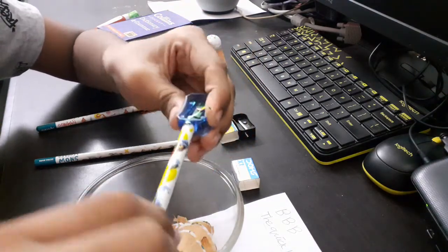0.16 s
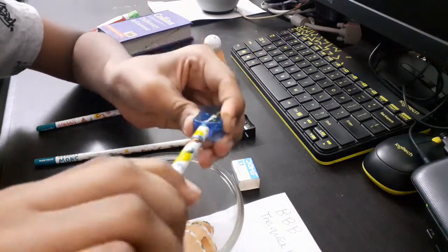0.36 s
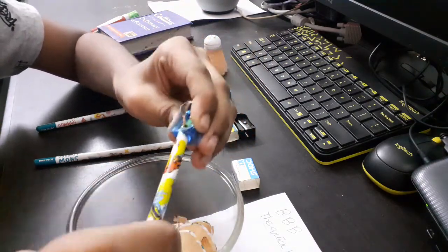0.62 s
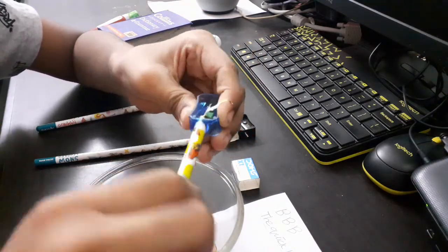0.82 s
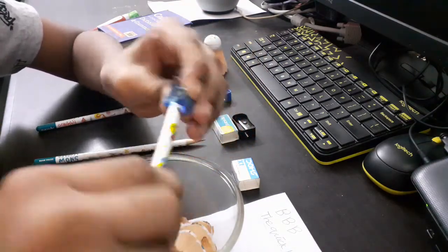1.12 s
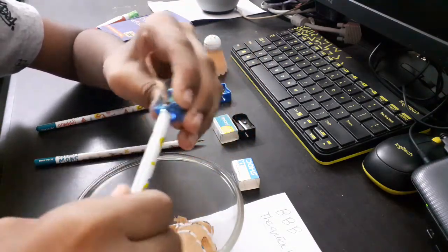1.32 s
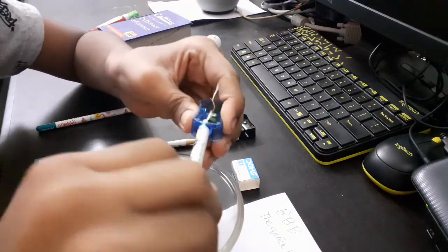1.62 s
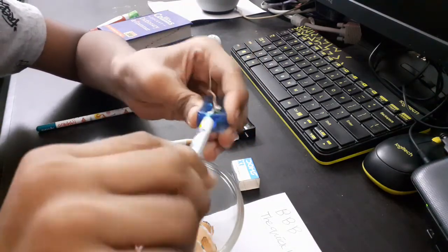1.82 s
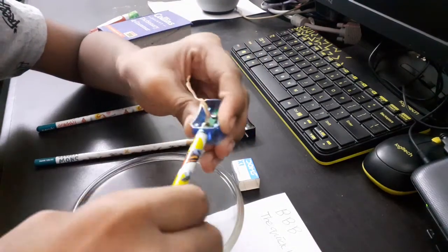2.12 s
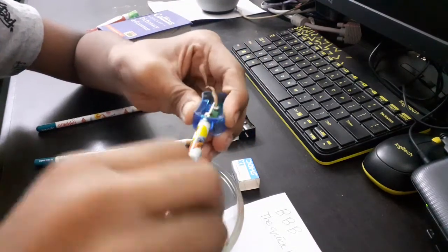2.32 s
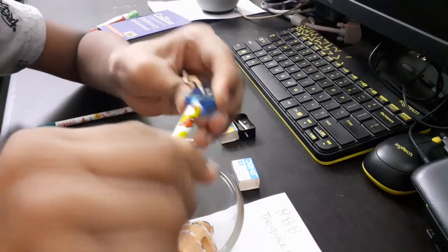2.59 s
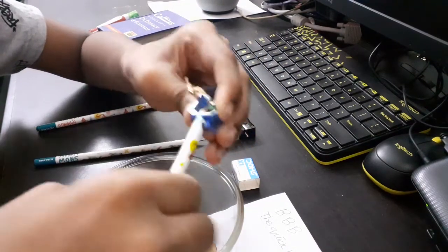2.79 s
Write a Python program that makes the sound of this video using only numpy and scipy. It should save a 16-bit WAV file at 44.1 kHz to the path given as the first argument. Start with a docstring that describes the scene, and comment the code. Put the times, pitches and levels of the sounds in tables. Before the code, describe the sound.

Dry scraping of a wooden pencil in a small plastic sharpener, four short turns.

```python
"""At a desk in a quiet room: a wooden pencil is twisted four times in a small plastic hand sharpener.
Each twist starts with a few catches of the blade, then fibres tear in a dense rasp that rings the
hollow sharpener, the pencil and the blade. Fingers regrip the pencil; something bumps the desk once.
Low room rumble, wavering hums and faint hiss lie beneath."""
import sys
import numpy as np
from scipy import signal
from scipy.fft import rfft, irfft, next_fast_len
from scipy.io import wavfile
from scipy.ndimage import uniform_filter1d

SR = 44100
rng = np.random.default_rng(int(sys.argv[2]) if len(sys.argv) > 2 else 0)


def to_wav(sig):
    """Store sig (one row per channel, or 1-D mono) as 16-bit WAV at the path in sys.argv[1].

    Samples outside -1..1 are clipped; the rate is SR.
    """
    pcm = np.clip(np.atleast_2d(sig), -1, 1) * 32767
    pcm = np.round(pcm).astype(np.int16)
    wavfile.write(sys.argv[1], SR, pcm.T)  # frames by channels


N = 130095

# deep cut, one list per twist: time_s, rasp_db, ring_rel_db, wood_rel_db, steel_rel_db
DEEP_CUTS = [
    [(0.398, -58.5, -10, -16, -6), (0.418, -48.5, -21.5, -20.5, -15), (0.502, -44.5, -3, -14, -8.5),
     (0.534, -65, 0, -3, 2), (0.54, -67, -3, -2, -7)],
    [(1.035, -58.5, -16, -17, -13), (1.061, -40, -11, -18, -16.5), (1.129, -37.5, -13, -19, -13.5),
     (1.135, -49.5, 1, -7, -9), (1.157, -47.5, -5, -7.5, -13.5), (1.209, -55, -2, -12, -12.5),
     (1.215, -81, -19, -12, -6)],
    [(1.822, -55.5, -1.5, -12, -4), (1.856, -42.5, 0.5, -16, -16), (1.889, -41, -3, -25, -22),
     (1.9, -37, -2, -24, -13), (1.926, -40, -5.5, -19, -17), (1.946, -56.5, -4, -8, -15)],
    [(2.505, -64.5, -15, -35, 2), (2.521, -49, -17, -26, -9), (2.545, -55.5, -9, -31, -3.5),
     (2.551, -40, -23.5, -50, -18), (2.634, -35, -4, -29, -13.5), (2.675, -50, -7, -8.5, -10.5),
     (2.68, -68, 2, -20, -14)],
]
# light grazing before each cut: time_s, rasp_db, ring_rel_db, wood_rel_db, steel_rel_db
GRAZES = [
    [(.373, -61.5, -8, -11, -12), (.398, -62.5, -6, -9, -12)],
    [(.925, -71, -21, -22, 3), (.96, -62, -14, -20, -3), (1.035, -68, -12, -7, -2)],
    [(1.746, -60.5, -3.5, -16, -10), (1.8, -70, -2, -12, -11), (1.822, -53.5, -1, -12.5, -6)],
    [(2.43, -78, -20.5, -26, -17), (2.47, -54, -36.5, -35, -6.5), (2.505, -72, -14, -21, -3.5)],
]
# blade catches and snaps: start_s, peak_db, ring_rel_db, steel_rel_db
SNAPS = [(0.1954, -54, -25, -15), (0.3708, -37, -9.5, -6), (0.384, -42, -22, -20), (0.4793, -41, -2, -26.5),
         (0.5111, -27.5, -10.5, -20), (0.5289, -34, -9, -12), (0.6004, -34, -4.5, -31),
         (0.629, -45, -1, -25), (0.9358, -40, -33, -9), (0.945, -35.5, -30, -9), (0.9527, -30.5, -33, -6.5),
         (0.9668, -37, -27.5, -21), (0.9923, -32, -35, -9.5), (1.0038, -31, -31, -23),
         (1.0264, -33, -14, -15), (1.0945, -22, -34, -42), (1.1258, -20, -35, -32),
         (1.152, -24.5, -33, -31), (1.181, -38, -13, -30), (1.601, -48.5, -36, -33),
         (1.7438, -34.5, -3, -18), (1.762, -29, -4, -7.5), (1.7728, -40, -4, -10),
         (1.8026, -29.5, -5.5, -7.5), (1.8135, -30, -16, -11), (1.831, -31, -19, -21),
         (1.8524, -20, -28, -24), (1.861, -17.5, -32, -27), (1.8673, -18.5, -5, -29),
         (2.393, -51.5, -32, -36), (2.427, -48, -37, -25), (2.4373, -39.5, -38, -26),
         (2.463, -40.5, -44, -19), (2.5215, -25.5, -25, -23.5), (2.551, -29, -24, -19),
         (2.5861, -21.5, -15, -28), (2.6325, -16.5, -3, -33), (2.67, -25.5, -23, -29)]
# rasp spectrum, lower and main range: freq_hz, density_db
RASP_LOW = [(500, -42.5), (1300, -25.5), (3500, -14.5)]
RASP_HIGH = [(5300, -6), (6300, -4), (8300, -2.5), (10500, -1.5), (13600, -2.5), (15100, -1.5),
             (15700, -0.5)]
# shaving, pencil and blade resonances: freq_hz, width_hz, gain_db
SHAVING_MODES = [(7400, 400, 1), (9350, 500, 0), (11800, 700, 0)]
WOOD_MODES = [(2034, 373, 1), (2615, 320, 5.5)]
STEEL_MODES = [(3813, 400, -2.5), (4660, 1300, -5.5)]
# hollow ring, set by the grip in each twist: pitch_hz
RING_HZ = [3206, 3220, 3284, 3333]
# finger slides: start_s, fall_20db_s, level_db
RUBS = [(0.135, 0.4, -68.5), (0.826, .05, -71), (2.145, .12, -68)]
# spectrum of skin on the pencil: freq_hz, density_db
SKIN_SPECTRUM = [(1500, -22), (2200, -4), (3000, -12), (3900, -2), (4600, 0), (5300, -13), (6400, -15),
                 (10000, -40)]
# faint squeaks: start_s, fall_20db_s, pitch_hz, level_db
SQUEAKS = [(.13, .25, 950, -76), (.37, .3, 960, -72), (.64, .12, 7500, -79), (1.603, .12, 9200, -79),
           (1.702, .15, 9300, -72)]
# regrip ticks: start_s, level_db, pitch_hz
TICKS = [(0.2741, -52.5, 3600), (0.8331, -58, 3760), (1.479, -64.5, 2600), (1.678, -62.5, 2800)]
# desk modes: freq_hz, gain_db, t60_s, delay_s
DESK_MODES = [(424, 0, 0.048, 0.0026), (526, 3.5, 0.039, 0), (108, -20.5, 0.54, 0.026),
              (729, -20, 0.07, 0.0035)]
# room decay: freq_hz, t60_s
ROOM_DECAY = [(1500, 0.58), (3000, 0.39), (4000, 0.43), (8000, 0.29), (15000, 0.33)]
# background spectra: freq_hz, density_db
RUMBLE_SPECTRUM = [(26, -42), (45, -11.5), (129, -8.5), (254, -2), (321, -6.5), (437, -12.5), (492, -10.5),
                   (537, -18), (669, -20.5), (924, -21.5), (1200, -32.5), (1500, -31.5), (1950, -62),
                   (3300, -120)]
HISS_SPECTRUM = [(710, -35), (1200, -10), (2250, -7.5), (2730, -12.5), (3430, -10.5), (7490, -22),
                 (8530, -25.5), (12600, -14), (16000, -13.5)]
# hum levels: time_s, low_db, middle_db, high_db
HUM_LEVELS = [(0.0, -87, -64, -74), (0.17, -77.5, -66.5, -60.5), (1.51, -68.5, -64.5, -69.5),
              (1.94, -69.5, -65.5, -67), (2.95, -74.5, -68.5, -85.5)]
# background stereo width: freq_hz, side_over_mid_db
AIR_WIDTH = [(40, -9), (150, -60), (350, -34), (700, -17.5), (1300, -18), (2500, -45), (6000, -11.5),
             (8500, -4.5), (15000, -13.5)]
# treble balance: freq_hz, left_over_right_db
STEREO_BALANCE = [(8000, -1), (8700, 11), (9600, 2), (11000, 2.5), (15000, 1.2)]
# treble phase: freq_hz, left_lead_rad
STEREO_PHASE = [(7500, 0.01), (8440, 0.82), (8870, 0.3), (9470, -.3), (11000, 0.01)]

TEARS_PER_S, TEAR_MEAN_DB, TEAR_T60_S = 800, 3.3, .005
SNAP_RISE_S, SNAP_T60_S = .0006, .011  # within a deep cut
CATCH_RISE_S, CATCH_T60_S = .0011, .015  # outside it
SNAP_CREST_DB, SNAP_WOOD_OVER_RING_DB = 6.5, -17.5
RING_WIDTH_HZ, FLICKER_DB = 390, 3.5
RUB_RISE_S, SQUEAK_RISE_S, SQUEAK_WIDTH_RATIO, TICK_WIDTH_HZ = .022, .003, .08, 2900
BUMP_S, BUMP_RISE_S, BUMP_DB = 1.9243, .008, -27.5
ROOM_DB, ROOM_DELAY_S = -13, .0054
RUMBLE_DB, RUMBLE_FLICKER_DB, HISS_DB = -60, 2, -76
HUM_HZ, HUM_WIDTH_HZ = [109.5, 187.5, 266], 28.2
BAND_LIMIT_HZ = 15850
TIME_S = np.arange(N) / SR


def sharpener():
    """Tears and snaps excite the shaving, the hollow shell, the pencil and the blade."""
    tears = tearing() * [flicker_noise(FLICKER_DB, bins=3, frames=18) for _ in range(4)]
    rasp, ring, wood, steel = tears + snapping() * rng.standard_normal((4, N))
    shaving = filtered(rasp, lambda hz: min_phase(RASP_LOW + RASP_HIGH)(hz) * shaving_response(hz))
    grip = np.arange(N) * len(RING_HZ) // N
    hollow = sum(filtered(ring * (grip == k), resonant([(hz, RING_WIDTH_HZ, 0)]))
                 for k, hz in enumerate(RING_HZ))
    pencil = filtered(wood, resonant(WOOD_MODES))
    blade = filtered(steel, resonant(STEEL_MODES))
    return shaving + hollow + pencil + blade


def tearing():
    """Fibres tear at random under the blade. Envelopes: rasp, ring, wood, steel."""
    onsets = rng.random(N) < TEARS_PER_S / SR
    sizes = onsets * amp(-TEAR_MEAN_DB * np.log(rng.random(N) + 3e-3))
    tears = unit_rms(signal.fftconvolve(sizes, burst(SNAP_RISE_S, TEAR_T60_S))[:N])
    grain = 2.5 + tears  # steady share plus tears
    envelopes = np.zeros((4, N))
    for rows in list(DEEP_CUTS) + GRAZES:
        times_s, rasp_db, *rel_db = np.transpose(rows)
        inside = (TIME_S >= times_s[0]) & (TIME_S < times_s[-1])
        grain_rms = np.sqrt(np.mean(grain[inside] ** 2))
        level = amp(np.interp(TIME_S, times_s, rasp_db)) * inside * grain / grain_rms
        envelopes += level * amp([np.zeros(N)] + [np.interp(TIME_S, times_s, db) for db in rel_db])
    return envelopes


def snapping():
    """Sharp snaps in a deep cut, softer catches outside it. Envelopes: rasp, ring, wood, steel."""
    snap, catch = burst(SNAP_RISE_S, SNAP_T60_S), burst(CATCH_RISE_S, CATCH_T60_S)
    envelopes = np.zeros((4, N))
    for start_s, peak_db, ring_db, steel_db in SNAPS:
        in_cut = any(rows[0][0] < start_s < rows[-1][0] for rows in DEEP_CUTS)
        shape = snap if in_cut else catch
        gains = amp([[0], [ring_db], [ring_db + SNAP_WOOD_OVER_RING_DB], [steel_db]])
        start = round(start_s * SR)
        envelopes[:, start:start + len(shape)] += amp(peak_db - SNAP_CREST_DB) * gains * shape
    return envelopes


def shaving_response(hz):
    """The shaving itself adds treble peaks to the rasp."""
    return 1 + sum(amp(db) * 1j * resonance(hz, mode_hz, width_hz)
                   for mode_hz, width_hz, db in SHAVING_MODES)


def fingers():
    """Skin slides on the painted pencil, with thin squeaks and dull ticks."""
    skin = filtered(flicker_noise(FLICKER_DB, bins=4, frames=4), min_phase(SKIN_SPECTRUM))
    out = sum(swell(*rub, RUB_RISE_S) for rub in RUBS) * skin
    for start_s, fall_s, hz, db in SQUEAKS:
        out += swell(start_s, fall_s, db, SQUEAK_RISE_S) * narrow_noise(hz, SQUEAK_WIDTH_RATIO * hz)
    for start_s, db, hz in TICKS:
        tick = swell(start_s, SNAP_T60_S / 3, db, SNAP_RISE_S) * rng.standard_normal(N)
        out += filtered(tick, resonant([(hz, TICK_WIDTH_HZ, 0)]))
    return out


def desk_bump():
    """A soft knock rings the desk; the lowest mode comes up last."""
    out = np.zeros(N)
    for hz, db, t60_s, delay_s in DESK_MODES:
        age_s = np.maximum(TIME_S - BUMP_S - delay_s, 0)
        rise = 1 - np.exp(-(age_s / BUMP_RISE_S) ** 2)
        out += amp(BUMP_DB + db - 60 * age_s / t60_s) * rise * np.sin(2 * np.pi * hz * age_s)
    return out


def room_reverb(x, parts=4):
    """Short noise tail, new for each part of the duration; decay time varies with frequency."""
    out = np.zeros(N)
    for k in range(parts):
        hz, age_s, spectra = signal.stft(rng.standard_normal(SR // 2), SR, nperseg=256)
        decay = amp(-60 * age_s / log_interp(ROOM_DECAY, hz)[:, None])
        tail = signal.istft(spectra * decay, SR, nperseg=256)[1]
        part = x * (np.arange(N) * parts // N == k)
        delayed = np.pad(part, (round(ROOM_DELAY_S * SR), 0))
        out += signal.fftconvolve(delayed, tail / np.linalg.norm(tail))[:N]
    return out


def rumble_and_hiss():
    """One channel of fluttering room rumble and steady hiss."""
    flutter = flicker_noise(RUMBLE_FLICKER_DB, bins=2, frames=8, size=2048)
    rumble = filtered(flutter, min_phase(RUMBLE_SPECTRUM))
    hiss = filtered(rng.standard_normal(N), min_phase(HISS_SPECTRUM))
    return amp(RUMBLE_DB) * rumble + amp(HISS_DB) * hiss


def background():
    """Rumble and hiss, nearly alike on both sides, with centred wavering hums."""
    mid = rumble_and_hiss()
    side = filtered(rumble_and_hiss(), lambda hz: amp(log_interp(AIR_WIDTH, hz)))
    times_s, *levels_db = np.transpose(HUM_LEVELS)
    hums = sum(amp(np.interp(TIME_S, times_s, db)) * narrow_noise(hz, HUM_WIDTH_HZ)
               for hz, db in zip(HUM_HZ, levels_db))
    return mid + hums + np.array([side, -side])


def amp(db):
    """dB to gain."""
    return 10 ** (np.asarray(db) / 20)


def unit_rms(x):
    """Scale a signal or complex response to rms 1."""
    return x / np.sqrt(np.mean(np.abs(x) ** 2) + 1e-20)


def log_interp(points, hz):
    """Interpolate (freq_hz, value) points on a log axis."""
    points_hz, values = np.transpose(sorted(map(tuple, points)))
    return np.interp(np.log(hz + 1), np.log(points_hz + 1), values)


def filtered(x, response):
    """Apply a complex frequency response."""
    size = next_fast_len(N + SR // 2)
    return irfft(rfft(x, size) * response(np.fft.rfftfreq(size, 1 / SR)), size)[..., :N]


def min_phase(spectrum):
    """Unit-power minimum-phase response through (freq_hz, density_db) points."""
    def response(hz):
        cepstrum = irfft(np.log(np.maximum(amp(log_interp(spectrum, hz)), 1e-5)))
        half = len(cepstrum) // 2
        cepstrum[1:half] *= 2
        cepstrum[half + 1:] = 0
        return unit_rms(np.exp(rfft(cepstrum)))
    return response


def resonance(hz, mode_hz, width_hz):
    """Second-order response of one mode."""
    return hz * width_hz / (mode_hz ** 2 - hz ** 2 + 1j * hz * width_hz)


def resonant(modes):
    """Unit-power response of steep-sided modes with alternating signs."""
    return lambda hz: unit_rms(sum((-1) ** k * amp(db) * resonance(hz, mode_hz, width_hz) ** 2
                                   for k, (mode_hz, width_hz, db) in enumerate(modes)))


def narrow_noise(hz, width_hz):
    """Noise through one resonance."""
    return filtered(rng.standard_normal(N), resonant([(hz, width_hz, 0)]))


def flicker_noise(depth_db, bins, frames, size=256):
    """White noise, rms 1, with patches of random gain in time and frequency."""
    spectra = signal.stft(rng.standard_normal(N + size), nperseg=size)[2]
    patches = uniform_filter1d(rng.standard_normal(spectra.shape), bins, 0)
    patches = unit_rms(uniform_filter1d(patches, frames, 1))
    return unit_rms(signal.istft(spectra * amp(depth_db * patches), nperseg=size)[1][:N])


def burst(rise_s, t60_s):
    """Tear envelope: quick rise, exponential fall."""
    age_s = TIME_S[:SR // 10]
    return (1 - np.exp(-(age_s / rise_s) ** 2)) * amp(-60 * age_s / t60_s)


def swell(start_s, fall_20db_s, db, rise_s):
    """Touch envelope: linear rise, exponential fall."""
    age_s = TIME_S - start_s
    return amp(db) * np.clip(age_s / rise_s, 0, 1) * amp(-20 * np.abs(age_s) / fall_20db_s)


def scene():
    """Sharpener and fingers with their reverb, plus desk bump and background."""
    near = sharpener() + fingers()
    return near + amp(ROOM_DB) * room_reverb(near) + desk_bump() + background()


def record(dry):
    """Two band-limited microphone ports; level and phase differ only above 6 kHz."""
    def ports(hz):
        split = np.array([[.5], [-.5]])
        balance_db = log_interp([(6000, 0)] + STEREO_BALANCE, hz)
        lead_rad = log_interp([(6000, 0)] + STEREO_PHASE, hz)
        return amp(split * balance_db) * np.exp(1j * split * lead_rad) * (hz < BAND_LIMIT_HZ)
    return filtered(dry, ports)


dry = scene()
out = record(dry)
to_wav(out)
```